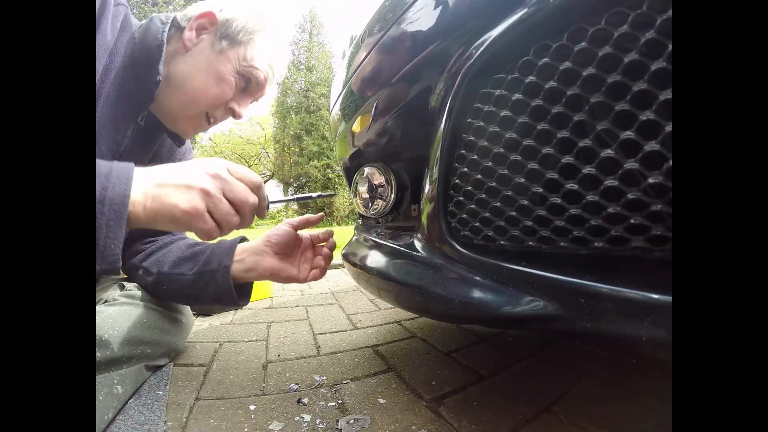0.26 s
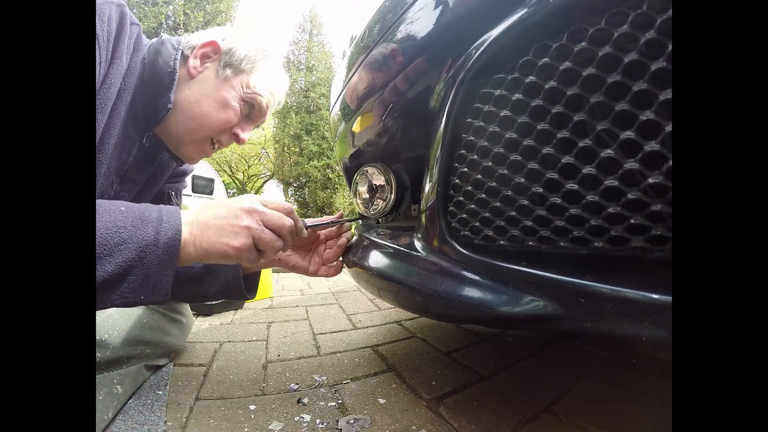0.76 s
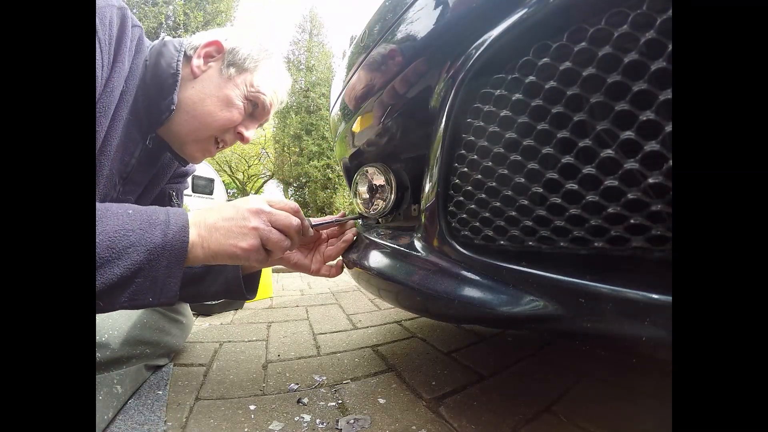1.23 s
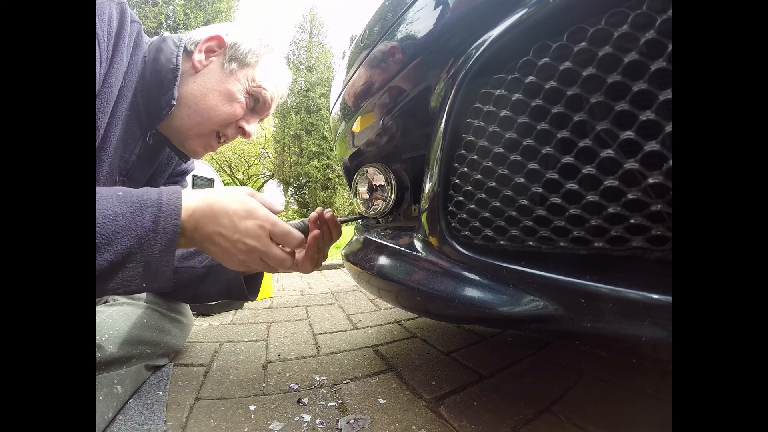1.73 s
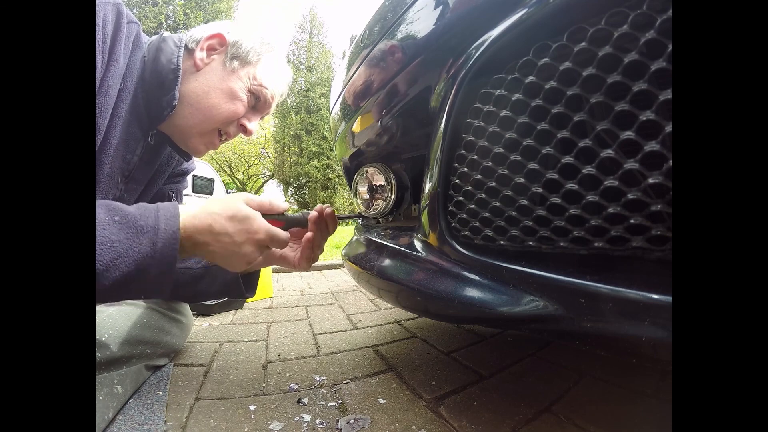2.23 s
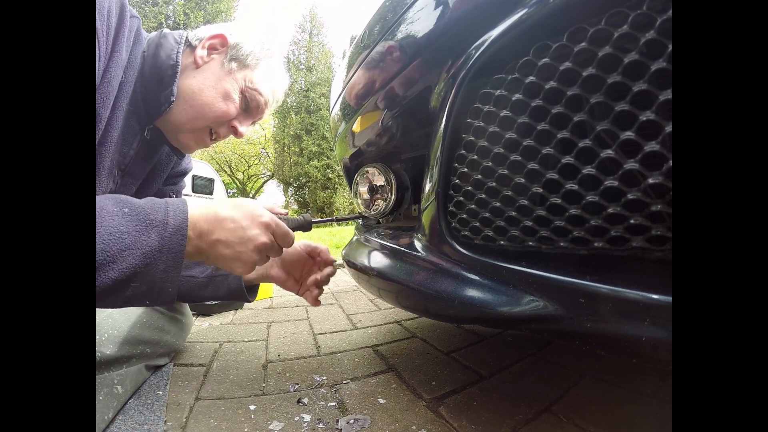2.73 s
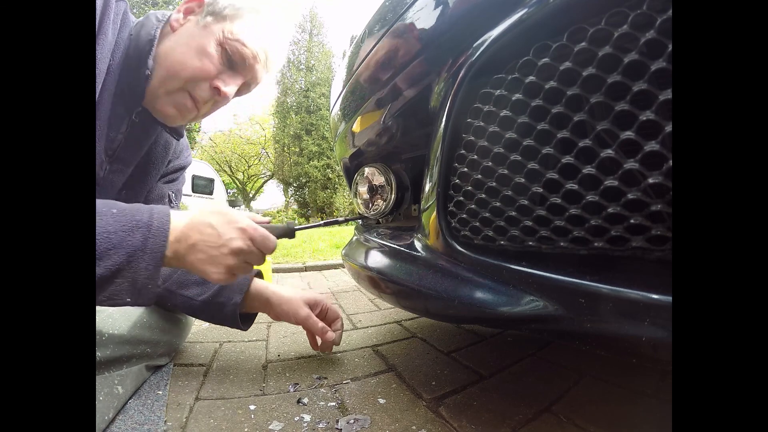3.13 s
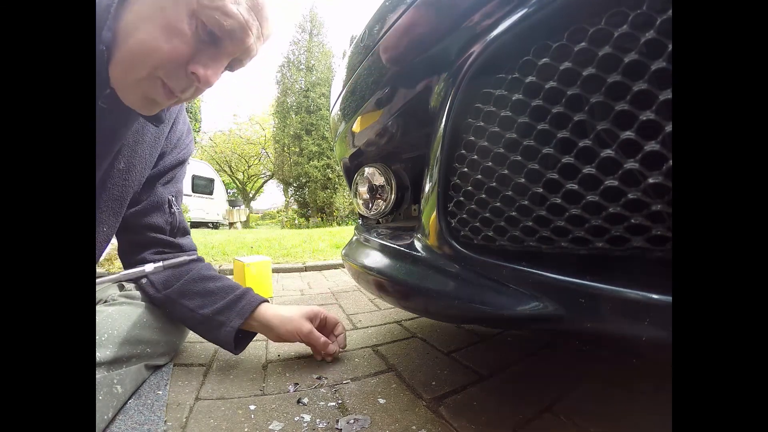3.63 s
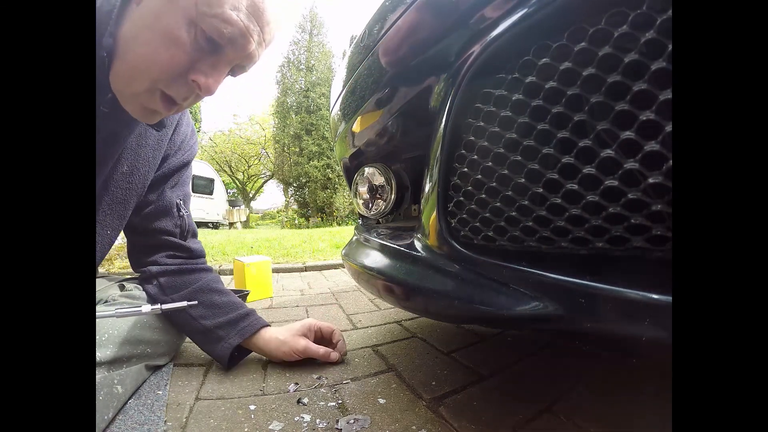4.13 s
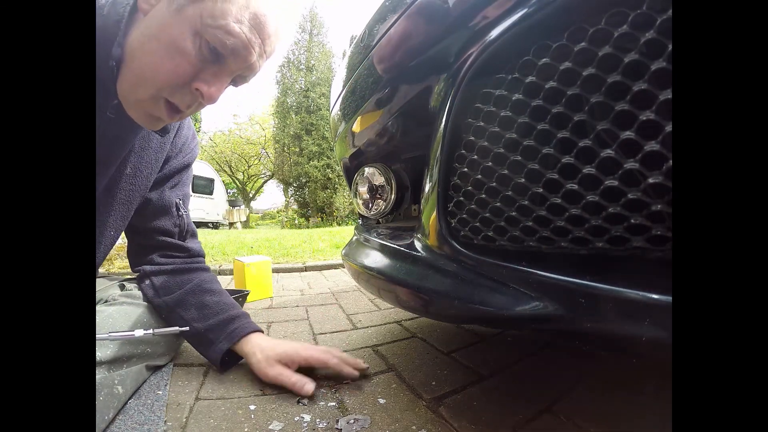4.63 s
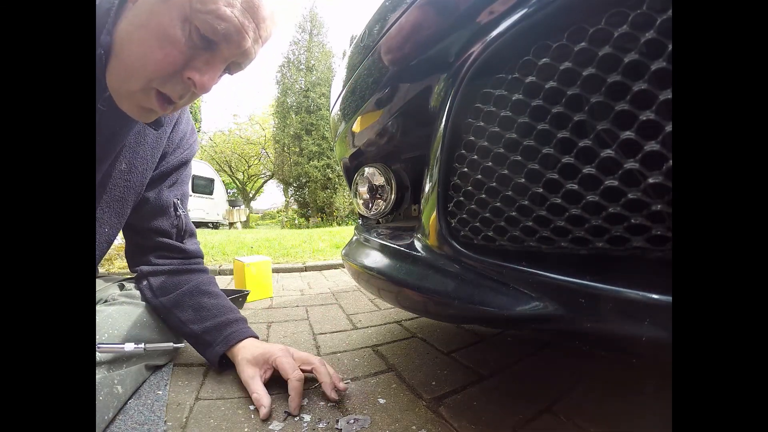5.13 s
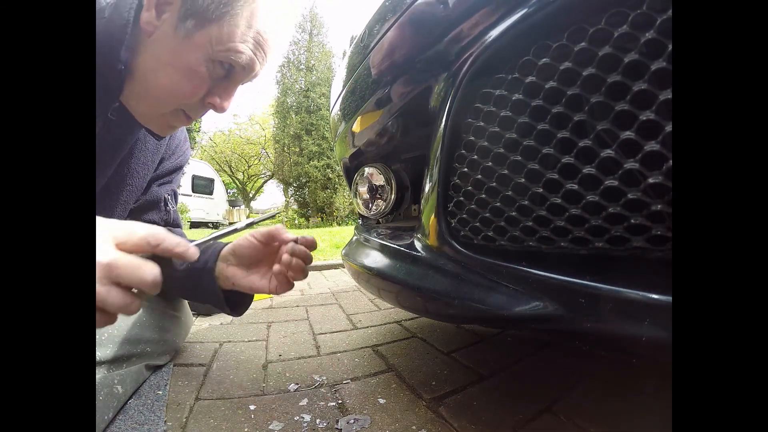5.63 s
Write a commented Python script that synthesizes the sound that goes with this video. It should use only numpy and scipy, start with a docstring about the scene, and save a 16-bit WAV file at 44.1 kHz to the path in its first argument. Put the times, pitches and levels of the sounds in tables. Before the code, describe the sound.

Sharp metal tool clicks and dull bumper knocks close by, while a vehicle pulls away beyond the drive with low, swelling engine hum.

```python
"""At once a screwdriver clicks and knocks at a car's bumper close by: noise bursts excite decaying modes.
Beyond the drive a vehicle pulls away; its hum sinks as the clutch bites, then climbs: harmonics of the firing.
Meanwhile a screw is turned out with whispers, ticks and scrapes, and sleeves rub softly: shaped friction noise.
The hum sinks for a gear change and climbs again over exhaust rumble, which is filtered, throbbing noise.
Throughout, over steady microphone hiss, distant tyre roar gives way to nearer tyres as their distance shrinks."""
import sys
import numpy as np
from scipy import signal
from scipy.fft import rfft, irfft
from scipy.io import wavfile
from scipy.ndimage import uniform_filter1d

SR = 44100
rng = np.random.default_rng(int(sys.argv[2]) if len(sys.argv) > 2 else 0)


def pcm_store(signal):
    """Save signal as 16-bit PCM."""
    levels = np.round(np.clip(np.atleast_2d(signal), -1, 1) * 32767)
    wavfile.write(sys.argv[1], SR, levels.astype(np.int16).T)


N = 259308
TIME = np.arange(N) / SR
FREQS = np.fft.rfftfreq(N, 1 / SR)
CLICK_TIME = np.arange(4096) / SR


def amp(db):
    """Logarithmic level: decibels to gain."""
    return 10 ** (np.asarray(db) / 20)


def unit(x):
    """Mean power: scales to rms 1."""
    return x / np.sqrt(np.mean(x ** 2) + 1e-20)


def peaking(x, db):
    """Hilbert envelope: scales a hit so that its envelope peaks at the given level."""
    return amp(db) * x / abs(signal.hilbert(x)).max()


def curves(rows):
    """Linear interpolation: each column of a timed table, sample by sample."""
    seconds, *columns = np.transpose(rows)
    return [np.interp(TIME, seconds, column) for column in columns]


def add(mix, start_s, sound):
    """Superposition: lays a sound into the mix at start_s seconds."""
    part = mix[max(round(start_s * SR), 0):][:len(sound)]
    part += sound[:len(part)]


def colour(x, points):
    """Linear filtering by a spectrum of (frequency [Hz], gain [dB]) points on a log-frequency axis."""
    hz, db = np.transpose(points)
    freqs = np.fft.rfftfreq(len(x), 1 / SR)
    gain = amp(np.interp(np.log(freqs + 1), np.log(hz), db))
    return irfft(rfft(x) * gain, len(x))


def noise(points):
    """Coloured noise of rms 1 with the given spectrum."""
    return unit(colour(rng.standard_normal(N), points))


def drift(rate_hz):
    """Low-passed chance of rms 1, fading out around the given rate."""
    smooth = np.exp(-(FREQS / rate_hz) ** 2)
    return unit(irfft(rfft(rng.standard_normal(N)) * smooth, N))


def bell(hz, centre_hz, octaves):
    """Gaussian weighting: a hump of gain on the octave scale."""
    return np.exp(-.5 * (np.log2((hz + 1) / centre_hz) / octaves) ** 2)


def band(x, centre_hz, octaves):
    """Band-pass filtering: keeps one hump of the spectrum."""
    size = 2 * len(x)  # zero padding lets the filter ring past the end
    gain = bell(np.fft.rfftfreq(size, 1 / SR), centre_hz, octaves)
    return irfft(rfft(x, size) * gain)[:len(x)]


def burst(decay_s, rise_s=0.0001):
    """Impulsive excitation: the gritty force of one contact, a quick rise and then a decay."""
    envelope = (1 - np.exp(-CLICK_TIME / rise_s)) * np.exp(-CLICK_TIME / decay_s)
    return rng.standard_normal(len(CLICK_TIME)) * envelope


def ring(modes, t, bright_hz, octaves, scatter=0.0046):
    """Modal synthesis: the place of contact detunes decaying modes a little and sets their signs."""
    hz, db, t60 = np.transpose(modes)[:, :, None]
    detune, place = rng.standard_normal((2, len(modes), 1))
    size = np.sign(place) * bell(hz, bright_hz, octaves)
    decay = amp(db - 60 * t / t60)
    return (size * decay * np.sin(2 * np.pi * hz * (1 + scatter * detune) * t)).sum(0)


# faint, steady microphone hiss: (frequency [Hz], relative density [dB per Hz])
MIC_HISS_SPECTRUM = [(1000, 2.5), (7000, 4), (10500, 3), (13000, 2), (15500, -2.5)]


def mic_hiss(level_db=-67.5):
    """Stationary noise: a faint, steady microphone hiss."""
    return noise(MIC_HISS_SPECTRUM) * amp(level_db)


# roar of distant tyres: (frequency [Hz], relative density [dB per Hz])
DISTANT_SPECTRUM = [(150, 5), (350, -7), (490, 2.5), (590, -2), (700, 2), (1020, 3), (1400, -2),
                    (1680, -4.5), (1900, -8), (2400, -11.5), (3200, -17.5), (4400, -22.5), (7000, -33),
                    (16000, -57)]
# swell of that roar, before flutter: (time [s], level [dB])
DISTANT_LEVEL = [(0, -42), (1.15, -41.5), (2.0, -43), (2.8, -45), (3.2, -43), (4.3, -45), (5.88, -45.5)]


def distant_tyres(flutter_db=0.83):
    """Amplitude modulation: a steady roar of coloured noise flutters about its slow level curve."""
    return noise(DISTANT_SPECTRUM) * amp(curves(DISTANT_LEVEL)[0] + flutter_db * drift(22))


# nearer tyres, with the peaks and dips of a reflection off the paving:
# (frequency [Hz], relative density [dB per Hz])
NEAR_SPECTRUM = [(200, -12), (450, 4), (590, -3), (700, 4), (830, -6.5), (980, -1.5), (1180, -15.5),
                 (1620, -6), (1900, -13.5), (2900, -17.5), (4100, -20), (5500, -26.5), (9000, -37),
                 (16000, -45)]


def near_tyres(reference_db=-54.5, start_m=88.6, aside_m=10.5, approach_m_per_s=12.47):
    """Inverse distance law: pressure grows as tyres approach along a road beside the drive."""
    distance_m = np.hypot(aside_m, start_m - approach_m_per_s * TIME)
    # the reference level holds at a distance of start_m
    return noise(NEAR_SPECTRUM) * amp(reference_db) * start_m / distance_m


# engine speed: the clutch bites, a long pull, a gear change, a slower pull:
# (time [s], firing rate [Hz])
FIRING_RATE = [(0, 70.4), (0.45, 62.7), (0.68, 63.17), (0.84, 50.9), (1.33, 56.66), (2.03, 66.83),
               (3.35, 85.16), (3.55, 84.7), (4.15, 58.15), (4.33, 64.76), (4.62, 62.4), (5.88, 71.7)]


def firing_turns():
    """Phase accumulation: the running integral of firing rate counts firings."""
    return np.cumsum(curves(FIRING_RATE)[0]) / SR


# turbulent exhaust gas: (frequency [Hz], relative density [dB per Hz])
RUMBLE_SPECTRUM = [(12, -25), (24, -4.5), (34, -8), (52, 2), (70, 1), (95, -4.5), (135, -1.5), (170, -9),
                   (205, -9.5), (245, -6.5), (275, -11.5), (315, -11), (400, -22.5), (2000, -97)]
# its load: (time [s], gain of deep rumble [dB], gain of body drone [dB])
RUMBLE_LOAD = [(0, -28, -31), (0.65, -28, -29.6), (1.3, -29.8, -31.5), (2.6, -27, -33), (3.7, -30, -30.3),
               (4.2, -30, -34.5), (4.7, -32, -35), (5.4, -34, -31), (5.88, -29, -33)]


def rumble(turns, split_hz=110, throb=0.27):
    """Turbulence noise booms in pipe and body; its upper part throbs with each firing."""
    deep_db, drone_db = curves(RUMBLE_LOAD)
    gas = noise(RUMBLE_SPECTRUM)
    low = irfft(rfft(gas) / (1 + (FREQS / split_hz) ** 4), N)
    throbbing = 1 + throb * np.cos(2 * np.pi * turns)
    return low * amp(deep_db) + (gas - low) * amp(drone_db) * throbbing


# exhaust hum before trim and waver: (time [s], firing tone [dB], its octave [dB])
HUM_LEVELS = [(0.0, -38, -35), (0.39, -35, -51), (0.52, -29, -46), (0.79, -29.5, -46), (1.21, -26.5, -34.5),
              (1.43, -32, -29.5), (1.73, -21.2, -23), (2.04, -24, -32.5), (2.34, -22.5, -28),
              (2.99, -28, -31.2), (3.4, -29, -41.5), (3.67, -35, -43), (4.06, -28.5, -32),
              (4.21, -33.5, -40), (4.7, -28.5, -27), (5.52, -27, -35), (5.6, -23, -36.5),
              (5.88, -32.5, -35.3)]
USUAL_HUM_DB = -27  # table level under an ordinary pull


def effort():
    """Level difference: how far the smoothed hum stands above its usual level, in dB."""
    first, second = map(amp, curves(HUM_LEVELS))
    smoothed = uniform_filter1d(np.hypot(first, second), size=22000)  # about half a second
    return 20 * np.log10(smoothed) - USUAL_HUM_DB


# weaker orders from unequal cylinders: (multiple of firing rate [1], mean level against the hum [dB])
WEAK_ORDERS = [(0.5, -12.5), (1.5, -41), (3, -20), (3.5, -31), (4, -24)]


def hum(turns, firing_db=0.58, octave_db=1.06, buried_db=-38.5, rough=0.35, waver_db=0.42, order_share=0.45):
    """Harmonic synthesis: the firing tone, its octave and weaker orders from unequal cylinders."""
    first, second = (amp(db + waver_db * drift(7.5)) for db in curves(HUM_LEVELS))
    angle = 2 * np.pi * (turns + .006 * drift(12))  # slightly uneven firing

    def clear(level):
        """Masking: off the throttle, the tones sink into the rumble."""
        return level ** 2 / np.hypot(level, amp(buried_db))

    # both tones reach a trough together once per firing
    tones = -amp(firing_db) * clear(first) * np.cos(angle)
    tones -= amp(octave_db) * clear(second) * np.cos(2 * angle)
    # the weaker orders follow only a share of the swells, in dB
    strength = amp(USUAL_HUM_DB + order_share * effort())
    for multiple, db in WEAK_ORDERS:
        level = amp(db) * strength * (1 + rough * drift(9.9))
        tones += level * np.cos(multiple * angle + 2 * np.pi * rng.random())
    return np.sqrt(2) * tones  # rms to peak


# scrapes of the screw and rubs of cloth, levels before swell and slips:
# (middle [s], length [s], level [dB], brightness [Hz], spread [octaves])
SCRAPES_AND_RUBS = [(0.11, 0.22, -51, 4300, 0.37), (0.088, 0.15, -61, 8500, 0.64),
                    (1.265, 0.047, -39, 1010, 1.46), (1.579, 0.13, -55.5, 4200, 0.84),
                    (1.71, 0.12, -64, 7500, 1), (1.864, 0.11, -58.5, 4170, 0.99),
                    (2.034, 0.044, -61, 6930, 1), (2.207, .16, -63.5, 4500, 0.84),
                    (2.39, 0.095, -60.5, 7000, 1.3), (3.459, 0.12, -60, 5900, 1.6),
                    (4.72, 0.12, -58.5, 4000, 0.8)]


def rubs(grain_db=4, clump_db=2):
    """Stick-slip friction: a swell of hiss broken into small slips that come in clumps."""
    out = np.zeros(N)
    slips = unit(amp(grain_db * drift(740) + clump_db * drift(50)))
    for middle_s, length_s, level_db, bright_hz, octaves in SCRAPES_AND_RUBS:
        n = int(length_s * SR)
        hiss = unit(band(rng.standard_normal(n), bright_hz, octaves))
        add(out, middle_s - length_s / 2, amp(level_db) * hiss * np.hanning(n) ** .5)
    return out * slips


def thread(from_s=1.42, to_s=2.4, level_db=-69, bright_hz=10000, octaves=1.7, grain_db=0.5, fits_db=3):
    """Sliding friction: the thread whispers in uneven fits while the screw is turned."""
    out, n = np.zeros(N), int((to_s - from_s) * SR)
    fits = amp(fits_db * drift(16) + grain_db * drift(700))[:n]
    hiss = band(rng.standard_normal(n), bright_hz, octaves) * fits
    add(out, from_s, amp(level_db) * unit(hiss * np.hanning(n) ** 0.19))
    return out


# thin ticks of the screw in its thread:
# (time [s], peak level [dB], centre pitch [Hz], spread [octaves])
SCREW_TICKS = [(0.1594, -26.5, 8650, 0.33), (0.87, -48, 6400, 0.21), (1.2647, -39, 12000, .25),
               (2.118, -44, 11000, .6), (2.5232, -46, 5920, 0.17), (2.9000, -53, 12980, 0.32),
               (3.0725, -49, 5620, 0.26), (4.958, -49, 11000, .5)]


def ticks(decay_s=0.0021):
    """Impulsive release: the small screw snaps in its thread, high and brief."""
    out = np.zeros(N)
    for s, level_db, hz, octaves in SCREW_TICKS:
        add(out, s, peaking(band(burst(decay_s), hz, octaves), level_db))
    return out


# plastic bumper modes: (frequency [Hz], relative level [dB], t60 [s])
BUMPER_MODES = [(178, 0, 0.18), (745, -11, 0.051), (805, 2, 0.022), (979, -6.5, 0.057), (980, -14, 0.013),
                (1460, 8, 0.024)]
# dull knocks on the bumper: (time [s], peak level [dB], centre pitch [Hz])
BUMPER_KNOCKS = [(0.0890, -20, 355), (0.1095, -25, 850), (0.4570, -30, 750), (1.0852, -31.5, 1000),
                 (1.2510, -20, 840), (1.2700, -27.5, 910), (1.33, -29.5, 940), (3.0950, -25.5, 1050)]


def knocks(soft_s=0.00027, thud_db=-8, thud_s=0.0012, thud_octaves=0.71):
    """Compliant impact: the bumper gives, so it starts softly and rings low over a short thud."""
    out = np.zeros(N)
    for s, level_db, hz in BUMPER_KNOCKS:
        panel = ring(BUMPER_MODES, CLICK_TIME, hz, octaves=0.19)
        panel = panel * (1 - np.exp(-CLICK_TIME / soft_s))
        thud = unit(band(burst(thud_s), hz, thud_octaves))
        add(out, s, peaking(unit(panel) + amp(thud_db) * thud, level_db))
    return out


# hard crack of steel on the lamp surround: (frequency [Hz], relative gain [dB])
CRACK_SPECTRUM = [(500, 15), (1400, -5), (2000, -1.5), (3000, -7), (3800, -1.5), (5200, -7), (6000, -6),
                  (7500, -7.5), (9600, -20), (12300, -5), (16000, -3)]
# modes of the screwdriver against the screw: (frequency [Hz], relative level [dB], t60 [s])
TOOL_MODES = [(1220, -7, .015), (1720, -1, .015), (1990, 7.5, 0.011), (2420, -7, 0.015), (2800, 2, 0.019),
              (3350, 0, 0.032), (3670, 5, 0.034), (4030, 8, 0.018), (4400, -21, 0.28), (4700, -37, 0.39),
              (4960, 0, .02), (5900, -17, 0.011), (7040, -12, 0.006), (7360, -5, 0.011), (9900, -27, 0.007),
              (12900, -18, .01), (13500, -30, .008)]


def contact(level_db, bright_hz, octaves=0.96, full_scale_s=0.00068, doubling_db=11.5):
    """Impact duration: a contact cracks and rings the tool; harder contacts are shorter."""
    # the decay time doubles for every doubling_db below full scale
    force = burst(full_scale_s * 2 ** (-level_db / doubling_db))
    crack = colour(band(force, bright_hz, octaves), CRACK_SPECTRUM)
    ringing = ring(TOOL_MODES, CLICK_TIME, bright_hz, octaves)
    return peaking(unit(crack) + unit(ringing), level_db)


# screwdriver clicks: (time [s], peak level of first contact [dB], its brightness [Hz])
TOOL_CLICKS = [(0.0100, -28.5, 2400), (0.0886, -15, 3170), (0.109, -19.5, 2500), (0.1175, -20.5, 2700),
               (0.4553, -14.5, 4140), (0.5385, -40, 2400), (1.0851, -33, 3130), (1.257, -32, 3900),
               (1.2670, -39, 2400), (3.0940, -39, 2990)]


def clicks(rebound_s=0.0024, rebound_db=-10, dulling=0.61):
    """Inelastic rebound: the blade strikes and falls back once, weaker and duller."""
    out = np.zeros(N)
    for s, level_db, bright_hz in TOOL_CLICKS:
        add(out, s, contact(level_db, bright_hz))
        add(out, s + rebound_s, contact(level_db + rebound_db, bright_hz * dulling))
    return out


def driveway(x, echo_db=-17, t60=0.16, dull_hz=7000):
    """Diffuse reflection: paving and bodywork scatter a short, weak, duller echo."""
    t = np.arange(SR // 4) / SR
    sparse = (rng.random(len(t)) < .08) * (t > .003)
    taps = rng.standard_normal(len(t)) * sparse * amp(-60 * t / t60)
    echo = signal.fftconvolve(x, taps / np.linalg.norm(taps))[:N]
    dulled = irfft(rfft(echo) / np.hypot(1, (FREQS / dull_hz) ** 2), N)
    return x + amp(echo_db) * dulled


def scene():
    """Superposition: hiss, tyres and engine behind the close handwork."""
    turns = firing_turns()
    background = mic_hiss() + distant_tyres() + near_tyres()
    handwork = rubs() + thread() + ticks() + knocks() + clicks()
    return (background + rumble(turns) + hum(turns) + driveway(handwork))[None]


def record(dry, edge_hz=15400):
    """Band limiting: the recorder's linear-phase low-pass filter."""
    low_pass = signal.firwin(401, edge_hz, window=("kaiser", 9), fs=SR)
    return signal.oaconvolve(dry, low_pass[None], "same")


dry = scene()
out = record(dry)
pcm_store(out)
```